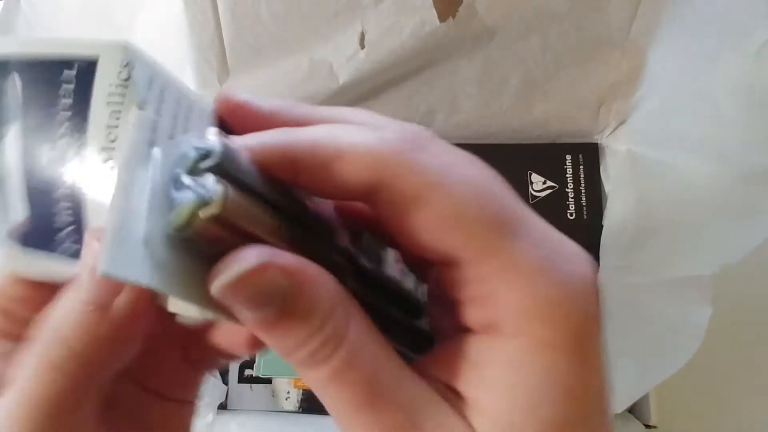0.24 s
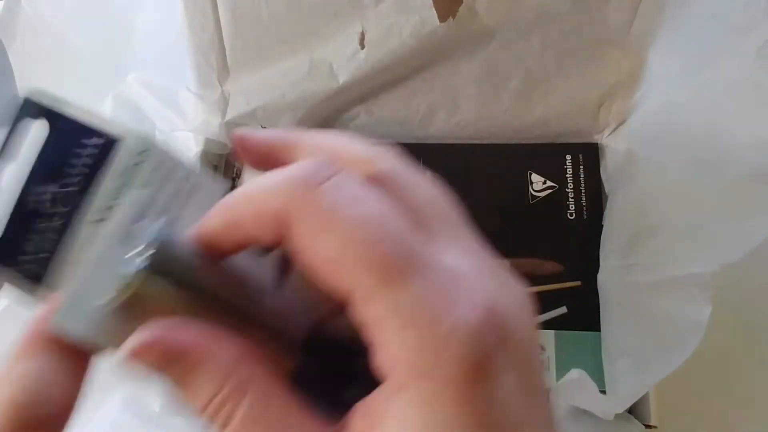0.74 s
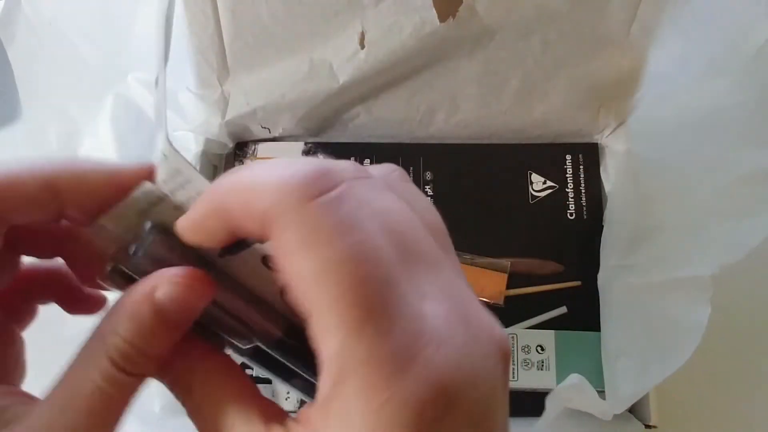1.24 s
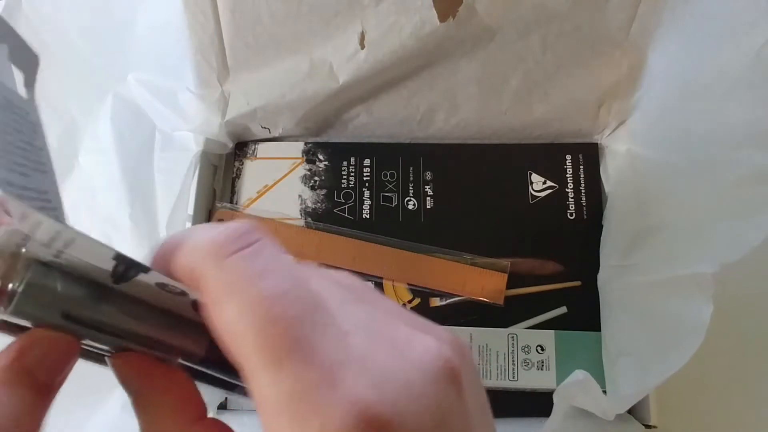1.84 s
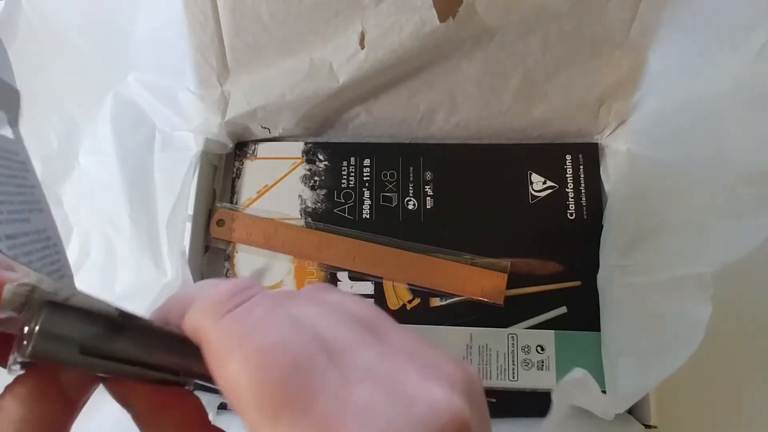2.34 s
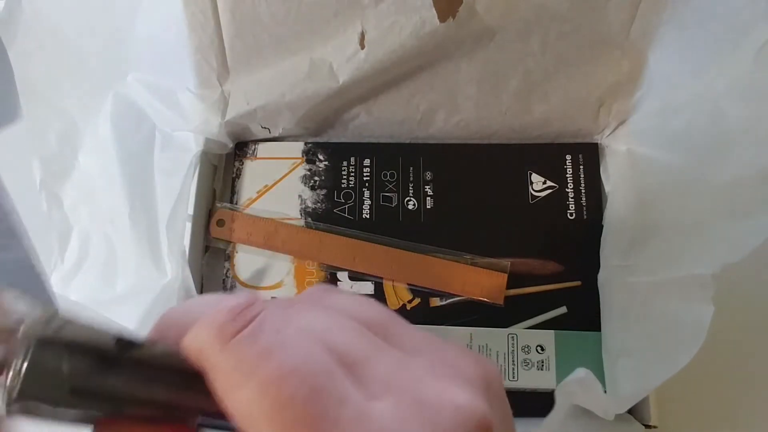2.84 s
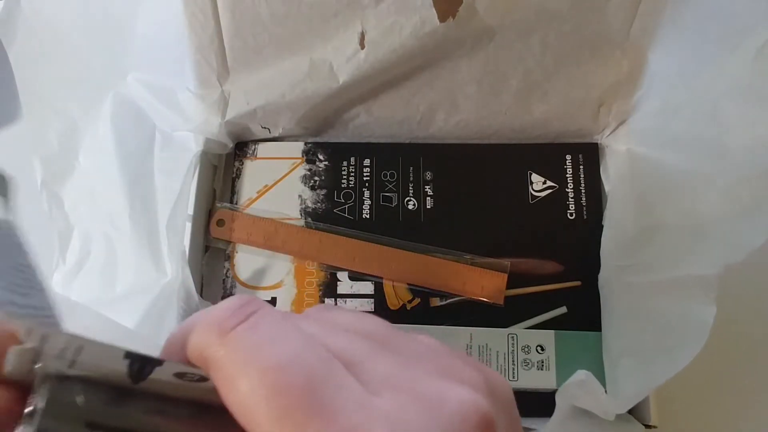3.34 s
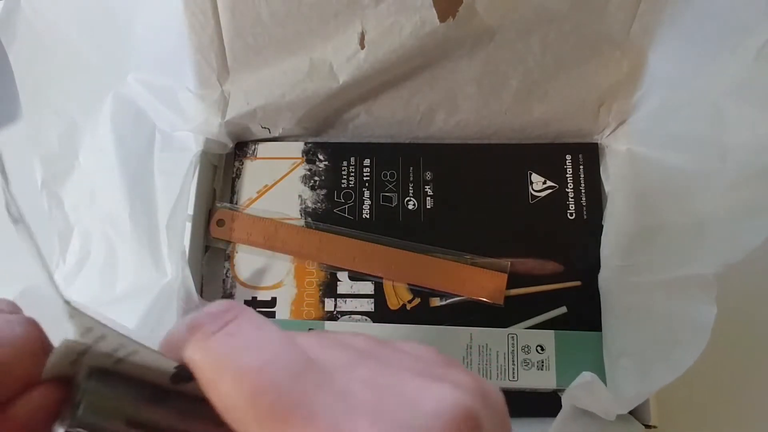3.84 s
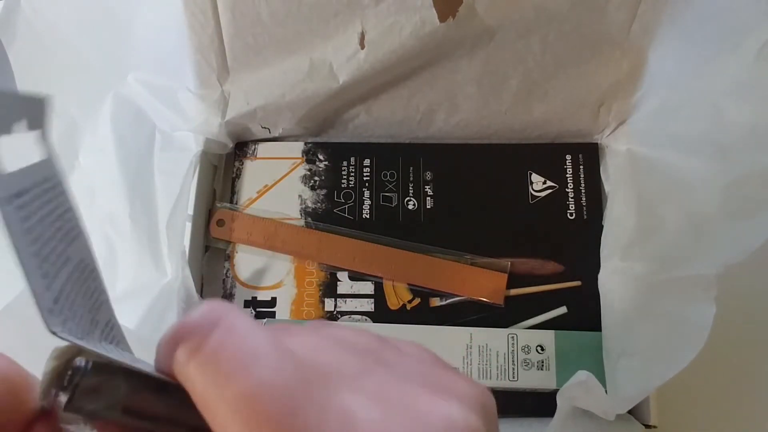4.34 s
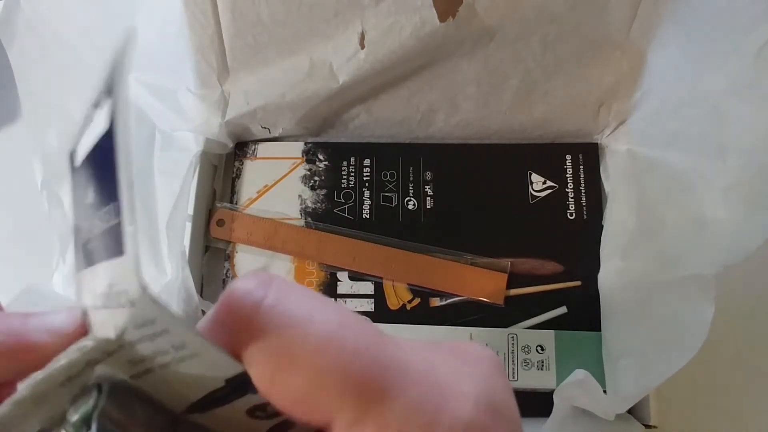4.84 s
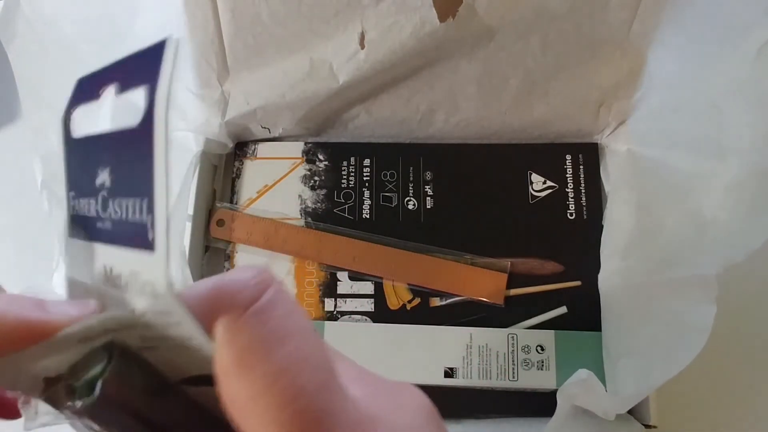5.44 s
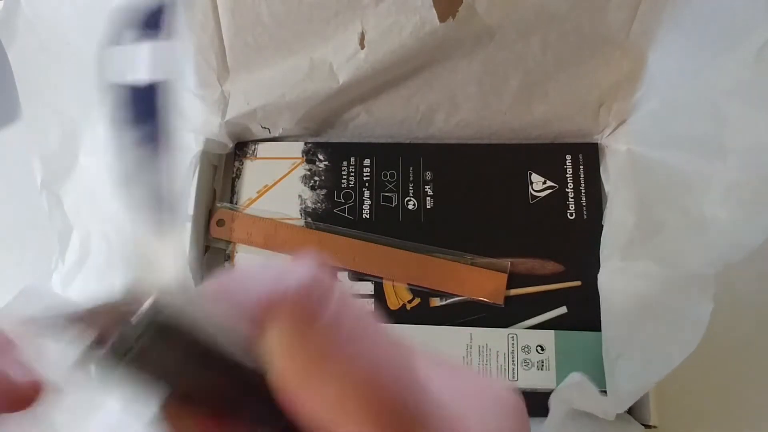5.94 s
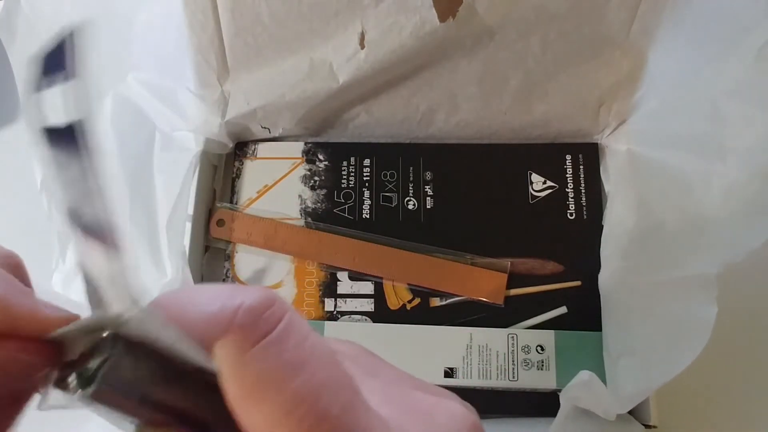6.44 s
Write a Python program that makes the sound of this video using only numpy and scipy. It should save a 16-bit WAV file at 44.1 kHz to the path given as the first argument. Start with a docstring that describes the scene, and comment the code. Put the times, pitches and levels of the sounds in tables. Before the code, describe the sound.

Stiff plastic blister packaging crackles and snaps in irregular sharp bursts as fingers bend it close up, in a quiet small room.

```python
"""A quiet room's coloured noise and a far hum, a wavering tone with its octave, lie underneath throughout.
From the very start rubs (showers of tiny cracks), card knocks and snaps (sharp coloured steps) mingle, as
fingers bend a stiff plastic blister pack; the room echoes them. Near 0.8 s the pack bumps the table, a
fading low tone. Snaps go on to the end, a very loud one early and many loud ones after 2 s.
The hands are left of a small stereo recorder, so the right is weaker; a limiter squeezes loud snaps."""
import sys
import numpy as np
from scipy import signal
from scipy.io import wavfile
from scipy.ndimage import uniform_filter1d, minimum_filter1d

SR = 44100
rng = np.random.default_rng(int(sys.argv[2]) if len(sys.argv) > 2 else 0)


def ratio_of_db(decibels):
    """Turn decibels (scalar or array-like) into linear amplitude factors; 0 dB maps to 1."""
    return 10 ** (np.asarray(decibels, float) / 20)


def output_pcm(signal):
    """Save a mono or channel-first signal as 16-bit PCM at the path in sys.argv[1].

    Samples are clipped to [-1, 1] before scaling.
    """
    pcm = np.clip(np.atleast_2d(signal).T, -1, 1) * 32767
    wavfile.write(sys.argv[1], SR, np.round(pcm).astype(np.int16))


N = 294493  # length [samples]
FAR_PORT_LAG_S = .0003  # the right port hears the hands this much later
THUMP_HZ = 400  # the card's dull thump lies mostly below this


def read(points, hz):
    """Looks up a table of (frequency, value), with frequency on a log scale."""
    f, value = np.transpose(points)
    return np.interp(np.log(hz + 1), np.log(f + 1), value)


def colour(x, points):
    """Gives a sound the listed spectrum, using a filter that only looks back in time."""
    hz = np.fft.fftfreq(4096, 1 / SR)
    log_gain = np.log(ratio_of_db(read(points, abs(hz))))
    # the Hilbert transform finds the phase that puts the energy as early as possible
    spectrum = np.exp(np.conj(signal.hilbert(log_gain)))
    taps = np.fft.ifft(spectrum).real[:2048]
    return signal.oaconvolve(np.atleast_2d(x), taps[None], axes=1)[:, :np.shape(x)[-1]]


def band(x, lo_hz, hi_hz):
    """Keeps one band of frequencies and scales it to rms 1."""
    sos = signal.butter(2, [lo_hz, min(hi_hz, .45 * SR)], "band", fs=SR, output="sos")
    y = signal.sosfilt(sos, x)
    return y / np.sqrt(np.mean(y ** 2) + 1e-20)


def add(mix, s, sound):
    """Mixes a sound in at time s, cutting what runs past the end."""
    part = mix[round(s * SR):][:len(sound)]
    part += sound[:len(part)]


# spectrum of the room tone, only its shape counts: (frequency [Hz], level [dB])
ROOM_TONE = [(24, -31), (40, 4), (536, -6), (957, -12), (1230, -11), (2970, -11), (6830, -22), (7750, -5.5),
             (10500, -31), (15300, -19), (16500, -58.5)]
# far hum, before the left/right balance:
# (time [s], frequency [Hz], level of the low tone [dB], level of its octave [dB])
FAR_HUM = [(0.0, 68.8, -68, -83.5), (1.53, 69.5, -71, -81), (3.12, 61.2, -73, -79.5),
           (5.64, 66.6, -67.5, -74), (5.84, 59.9, -71, -74), (6.01, 63.4, -68.5, -74),
           (6.68, 61.7, -81, -86.5)]


def background():
    """Room tone is noise partly shared by the ports; the hum is a wavering low tone and its octave."""
    noise = rng.standard_normal((3, N))
    tone = colour(noise[:2] + 0.14 * noise[2], ROOM_TONE)
    drift = band(rng.standard_normal(N), 2.1, 19)  # the tone breathes a little
    tone *= ratio_of_db(-65 + 0.89 * drift) / np.sqrt(np.mean(tone ** 2))
    s, *columns = np.transpose(FAR_HUM)
    hz, low_db, octave_db = (np.interp(np.arange(N) / SR, s, c) for c in columns)
    waver = 1 + 1.2 * uniform_filter1d(rng.standard_normal(N), 2000)
    phase = 2 * np.pi * np.cumsum(hz * waver) / SR
    hum = np.sqrt(2) * (ratio_of_db(low_db) * np.sin(phase) + ratio_of_db(octave_db) * np.sin(2 * phase))
    return (tone + hum) * ratio_of_db(np.array([[2.5], [-2.5]]))  # left a little louder


# how the plastic sheet colours cracks and snaps: (frequency [Hz], level [dB])
PLASTIC_SHEET = [(120, -68.5), (500, -11.5), (1200, -4), (2500, 2.5), (4000, 5.5), (6500, 6), (12000, 6)]
# facets of the blister that take turns to sound: (frequency [Hz])
FACET_TONES = [1100, 1500, 2000, 2700, 3600, 4700, 6000]
# fingers rubbing: (time of full pressure [s], hold [s], crackle level before the microphone [dB],
# card level against the film [dB], treble edge level against the film [dB])
FINGER_RUBS = [(0.021, 0.083, -37.5, -13.5, 3.5), (0.245, 0.099, -45.5, -16, -6.5),
               (0.374, 0.017, -37.5, -45, 9.5), (0.592, 0.016, -35, -30, 2), (0.608, 0.015, -26, -21, -3.5),
               (0.665, 0.088, -37.5, -5, -2), (0.774, 0.0041, -28.5, 4, -11),
               (0.788, 0.013, -55.5, -2, 0.5), (0.863, 0.033, -47.5, -8, 5.5),
               (1.066, 0.074, -59.5, -24, 10), (1.187, 0.018, -34, -3.5, 1.5), (1.261, 0.052, -45.5, 0, -3),
               (1.341, 0.054, -42, -0.5, 1), (1.425, 0.033, -40, -5, -1.5), (1.716, 0.011, -52.5, -0.5, 4),
               (1.863, 0.044, -43.5, -11, 0), (2.637, 0.023, -62, 3, 4), (2.754, 0.007, -65, -6, -15),
               (2.994, 0.026, -40, -11.5, 3.5), (3.312, 0.054, -49, -19, -17), (4.03, .03, -6.5, -22.5, -2),
               (4.381, 0.015, -35.5, -37, 7), (4.7, 0.033, -53.5, 1, -17), (4.841, 0.015, -48.5, -14, -8),
               (5.054, .05, -21, -25, -2), (5.408, 0.025, -42.5, -5, 6.5), (5.552, 0.091, -56, -13, 5.5),
               (5.741, 0.0043, -55, 2, -15), (5.869, 0.055, -22.5, -8.5, 13.5),
               (6.153, 0.0065, -54.5, -41, 4), (6.232, 0.016, -61, -24, -3),
               (6.36, 0.0077, -52.5, -10.5, -19), (6.477, 0.017, -59.5, -1.5, -10.5)]


def rubs():
    """Moving fingers set off dense tiny cracks of uneven size, in clumps, on plastic and card."""
    cracks_per_s, spread_db, clump_db = 3600, 2.4, 1.5
    facet_db = 2.5  # how strongly each facet comes and goes
    card_hz, card_ring_db = 950, -6  # the card rings a little under the fingers
    press_s, still_db = 0.032, -74.5  # a rub swells from this level over this time
    tire_db_per_s, lift_db_per_s = 89, 1109.5  # sag from full pressure on; extra fall once the finger lifts

    clumps = band(rng.standard_normal(N), 30, 170)
    size = ratio_of_db(spread_db * np.minimum(rng.exponential(1, N), 5) + clump_db * clumps)
    cracks = size * (rng.random(N) < cracks_per_s / SR) * rng.choice([-1., 1.], N)
    facets = np.zeros(N)
    for hz in FACET_TONES:
        turns = facet_db * band(rng.standard_normal(N), 8, 40)
        share = ratio_of_db(read(PLASTIC_SHEET, hz) + turns) * np.sqrt(hz)
        facets += share * band(cracks, hz / 1.2, hz * 1.2)
    film = band(facets, 1400, 5200)
    edge = band(cracks * rng.choice([-1., 1.], N), 6200, 24000)
    card_ring = band(cracks, card_hz / 1.1, card_hz * 0.98)
    card = band(cracks, 78, 1200) + ratio_of_db(card_ring_db) * card_ring

    out = np.zeros(N)
    t = np.arange(N) / SR
    for s, hold, level_db, card_db, edge_db in FINGER_RUBS:
        now = slice(max(round((s - .1) * SR), 0), round((s + hold + .1) * SR))
        since = t[now] - s
        swell_db = (still_db - level_db) * since / press_s
        loss_db = np.where(since < 0, swell_db, tire_db_per_s * since)
        loss_db = loss_db + lift_db_per_s * np.maximum(since - hold, 0)
        crackle = film[now] + ratio_of_db(card_db) * card[now] + ratio_of_db(edge_db) * edge[now]
        out[now] += ratio_of_db(level_db - loss_db) * crackle
    return out


# how long the room takes to die away by 60 dB: (frequency [Hz], time [s])
ROOM_DECAY = [(200, 0.13), (530, 0.2), (1390, 0.21), (3680, 0.22), (9700, 0.17)]
# strength of the room's answer, left then right: (level [dB])
ROOM_LEVEL = [-7.5, -11]


def room(x):
    """Walls return sparse echoes of random sign for each row and port; each band dies at its own speed."""
    rise_s = 0.0087  # the room builds up after the sound
    wall_s, wall_width_s, wall_db = 0.0095, 0.0023, -0.5  # first strong reflection
    length = SR // 2
    taps = np.zeros((len(x), 2, length))
    delay = np.arange(length) / SR
    slots = np.arange(160, length - 12, 12)
    at = slots + rng.integers(0, 12, (len(x), 2, len(slots)))  # one echo somewhere in each slot
    np.put_along_axis(taps, at, rng.choice([-1., 1.], at.shape), 2)
    build_up = 1 - np.exp(-(delay / rise_s) ** 2)
    wall = ratio_of_db(wall_db) * np.exp(-((delay - wall_s) / wall_width_s) ** 2)
    taps *= build_up + wall
    hz, t, z = signal.stft(taps, SR, nperseg=128)
    decay = ratio_of_db(-60 * t / read(ROOM_DECAY, hz)[:, None])
    tail = signal.istft(z * decay, SR, nperseg=128)[1]
    tail *= ratio_of_db(np.array(ROOM_LEVEL))[:, None] / np.linalg.norm(tail, axis=2, keepdims=True)
    return signal.oaconvolve(x[:, None], tail, axes=2)[..., :N].sum(0)


def thump(hz):
    """Power spectrum of the card's dull low motion: weak above THUMP_HZ and below 70 Hz."""
    return 1 / (1 + (hz / THUMP_HZ) ** 4) / (1 + (70 / hz) ** 4)


def struck(peak_db, hz, power):
    """A sudden jolt: one sharp click with the given power spectrum and peak."""
    click = np.zeros(1500)
    click[0] = 1
    sound = colour(click, np.transpose([hz, 10 * np.log10(power)]))[0]
    return ratio_of_db(peak_db) * sound / abs(sound).max()


# the backing card jerks: (time [s], peak level before mixing [dB])
CARD_KNOCKS = [(0.0288, -26.5), (0.6891, -30), (0.7384, -27), (0.777, -15), (0.8942, -42), (1.1936, -37),
               (1.3586, -49), (1.4391, -32), (1.9388, -49), (2.1873, -27.5), (2.2964, -28.5), (2.5092, -21),
               (2.8578, -26), (3.1298, -26.5), (3.3656, -24), (3.5157, -25.5), (3.5842, -22), (3.727, -45),
               (4.032, -23), (4.698, -38), (5.0552, -15), (5.2076, -38), (5.2853, -23.5), (5.301, -18.5),
               (5.4127, -45), (5.8719, -32.5), (5.8935, -33), (6.613, -38)]


def knocks():
    """The card jerks with a dull knock; lists (time, sound, share heard directly)."""
    hz = np.geomspace(30, 20000, num=60)
    return [(s, struck(peak_db, hz, thump(hz)), .5) for s, peak_db in CARD_KNOCKS]


def snap(peak_db, panel_hz, ring_db, edge_db):
    """A crease gives way: the colour of the sheet, a briefly ringing panel and the thump of the card."""
    tilt_hz, ring_octaves = 4200, .23  # brightness acts above the first; width of a panel's ring
    thump_db = -28  # every snap also shakes the card a little
    hz = np.geomspace(30, 20000, num=120)
    sheet = ratio_of_db(read(PLASTIC_SHEET, hz) + edge_db / (1 + (tilt_hz / hz) ** 4)) ** 2
    ring = ratio_of_db(ring_db) ** 2 * np.exp(-(np.log2(hz / panel_hz) / ring_octaves) ** 2)
    card = ratio_of_db(thump_db) ** 2 * thump(hz)
    # powers as shares of the whole band, so that narrow parts stand higher per Hz
    power = sheet + ring * tilt_hz / (ring_octaves * panel_hz) + card * tilt_hz / THUMP_HZ
    return struck(peak_db, hz, power)


# creases snapping: (time [s], peak level before mixing [dB], ringing panel frequency [Hz],
# ring level [dB], brightness [dB])
CREASE_SNAPS = [(0.0293, -8.5, 3000, -14, -5.5), (0.1694, 19.5, 4200, -9.5, -11),
                (0.292, -7.5, 1160, -7.5, -3), (0.37, -10, 3500, 14, 12), (0.384, -22, 3190, 21.5, -1),
                (0.4708, -19.5, 5230, -5, -5), (0.6917, -13, 540, -5, -16.5), (0.6976, -14.5, 656, 6, -9.5),
                (0.7391, -7.5, 675, -8, -10.5), (0.7672, 1.5, 5500, 15, 10), (0.7765, 1.5, 720, -2, -13.5),
                (0.8914, -15.5, 770, -8.5, -13.5), (0.975, -33, 1900, 3, -1),
                (1.193, -0.5, 1790, -0.5, -13), (1.2674, -14.5, 904, -8, -21.5), (1.3183, -16, 1020, 9, -8),
                (1.3611, -18, 930, 1.5, -19), (1.4393, -5, 4930, 5.5, -7.5), (1.5313, -5, 960, -9, -17.5),
                (1.603, -2, 1620, -15, -20.5), (1.7251, -17.5, 3160, -4, -9.5),
                (1.8638, -12, 1220, -5.5, -19.5), (1.9382, -19.5, 970, -5.5, 2.5),
                (1.983, -5.5, 1810, -15, -32.5), (2.1303, -0.5, 4480, 1.5, 0.5), (2.1809, 5, 2160, -6, -13),
                (2.1876, -1.5, 5330, -17.5, -15), (2.1998, 4, 2200, -6, -22), (2.2964, 8, 4450, 6.5, 1.5),
                (2.3201, 10.5, 6000, 10.5, 7), (2.4145, 12.5, 5100, 12, 7.5),
                (2.461, -3, 2135, -11.5, -23.5), (2.5104, 14, 931, -1.5, -5.5), (2.6447, -29, 980, -6, -11),
                (2.7395, -25.5, 940, -10, -15), (2.8201, -4, 5800, -13, 1.5), (2.8569, 11, 5360, 7.5, 3.5),
                (2.9806, -16, 6160, 3, 4), (2.99, -12, 5930, -2, 4), (3.1295, 15.5, 4810, -8.5, 2.5),
                (3.1533, 11, 5220, 2.5, 11), (3.3668, 12, 2920, 11.5, 7.5), (3.45, -2, 2840, 0, -19.5),
                (3.5166, 9.5, 5040, 6.5, -7), (3.5721, 1.5, 5500, 2.5, -4.5),
                (3.5843, 13.5, 2030, -6.5, -14.5), (3.6084, 4, 1810, -9, 3.5), (3.6171, -3, 2180, 0.5, -7),
                (3.785, -31.5, 2000, -4.5, -10), (3.815, -26, 3470, 0, -8), (3.8384, 1, 1930, -7.5, -13.5),
                (4.0145, 18.5, 3300, -9, -7.5), (4.031, 8.5, 1940, -11.5, -4.5), (4.0551, 4, 3100, -9, -11),
                (4.1633, 11.5, 5500, -3.5, -12), (4.2834, 1, 1930, -4.5, -13.5),
                (4.3938, -11.5, 1605, -5, -13), (4.4922, -17, 3920, 2, -14.5),
                (4.5044, -15.5, 1120, -16.5, -17.5), (4.5432, -7.5, 2540, -10, -15),
                (4.5505, 23, 1619, -15, -10.5), (4.6974, -15, 730, -4.5, -17),
                (4.827, -25.5, 1330, -3, -24.5), (4.9046, 19, 1688, -8.5, -6),
                (5.0517, -9.5, 3270, -4, -23), (5.0544, 14, 3200, 1, -9), (5.0878, 15.5, 5600, 4, 2),
                (5.1657, -5, 5230, 0.5, -10.5), (5.2075, -26, 620, 6.5, -12.5),
                (5.2644, -14.5, 1070, -8, -14.5), (5.2848, 10.5, 4440, 1.5, -6.5),
                (5.3004, 11.5, 1330, -7, -6), (5.4142, -9.5, 1830, -5.5, -16),
                (5.5604, -26, 5260, 3, -11.5), (5.6647, -31.5, 970, -1, -10), (5.7478, -7, 5950, 1, -11),
                (5.7582, -8.5, 4800, 2.5, -10), (5.8342, -16.5, 5100, 9.5, 7.5),
                (5.857, 10, 4770, 11, -3.5), (5.8724, 9, 1400, -5, -13), (5.8938, -4, 1680, 3.5, -7),
                (5.9145, 16, 5700, -15.5, -5.5), (6.0168, 7, 2740, -5, -17), (6.027, 1, 2500, -8.5, -10),
                (6.3537, -18, 5960, -2.5, -5.5), (6.4719, -30.5, 950, -3, -13),
                (6.5451, 2.5, 5740, -1, -4.5), (6.614, 11.5, 6500, -1.5, -5)]


def snaps():
    """Creases snap through, weaker ones less abruptly; lists (time, sound, share heard directly)."""
    crisp_db = -4  # a snap with this peak is half direct
    return [(s, snap(*how), 1 / (1 + ratio_of_db(crisp_db - how[0]))) for s, *how in CREASE_SNAPS]


# strength of the scattered sound, left then right: (level [dB])
SCATTER_LEVEL = [1.5, -6]


def spread(events):
    """Hands, pack and box scatter each jolt; rows dealt in turn meet different room reflections."""
    fade_s = 0.0022
    lead_in_s, lead_in_db = .0015, -15.5  # a faint noise swells just before each jolt
    rows, direct, scatter = np.zeros((3, N)), np.zeros(N), np.zeros((2, N))
    t = np.arange(-200, 700) / SR - np.array([[0], [FAR_PORT_LAG_S]])
    lead_in = ratio_of_db(lead_in_db) * np.exp(-abs(t) / lead_in_s)
    shape = np.where(t > 0, np.exp(-abs(t) / fade_s), lead_in)
    for k, (s, sound, abrupt) in enumerate(events):
        add(rows[k % 3], s, sound)
        add(direct, s, sound * abrupt)
        paths = rng.standard_normal(t.shape) * shape
        for port in range(2):
            gain = ratio_of_db(SCATTER_LEVEL[port]) / np.linalg.norm(paths[port])
            add(scatter[port], s + t[0, 0], gain * signal.fftconvolve(sound, paths[port]))
    return rows, direct, scatter


def ports(x):
    """Direct sound reaches the right port later and shadowed."""
    lag = round(FAR_PORT_LAG_S * SR)
    return np.array([x, ratio_of_db(-12.5) * np.pad(x, (lag, 0))[:N]])


def bump():
    """The pack once bumps the table under the recorder: a low thud that swells fast and dies away."""
    start_s, level_db, hz, t60_s, rise_s = .778, -19, 78, 0.092, 0.0043
    t, out = np.arange(SR // 4) / SR, np.zeros(N)
    envelope = ratio_of_db(level_db - 60 * t / t60_s) * (1 - np.exp(-t / rise_s))
    add(out, start_s, envelope * np.sin(2 * np.pi * hz * t))
    return out


# how the microphones colour the pack and its echoes: (frequency [Hz], gain [dB])
MIC_COLOUR = [(40, 6.5), (100, 2.5), (6500, 4), (7200, 2.5), (7850, 12.5), (8500, 5), (10500, -13.5),
              (15300, -6.5), (16500, -39.5)]


def microphones(left, right):
    """So close, bass falls off further on the way to the right; both ports then share one colour."""
    bass_hz, bass_far_db = 288, -7.5
    right = colour(right, [(bass_hz / 2, bass_far_db), (bass_hz * 2, 0)])[0]
    return colour(np.array([left, right]), MIC_COLOUR)


def scene():
    """Pack, room and background at the two ports."""
    creases, direct, scatter = spread(snaps() + knocks())
    fingers = rubs()
    turn = 14. * np.arange(N) / SR  # moving hands keep changing what the rubs reflect from
    echoes = room(np.vstack([creases, fingers * np.cos(turn), fingers * np.sin(turn)]))
    left, right = ports(direct + fingers + bump()) + scatter + echoes
    return microphones(left, right) + background()


def band_limit(x):
    """A steep low-pass at the top of the band."""
    return signal.sosfilt(signal.butter(12, 17000, fs=SR, output="sos"), x)


def record(dry):
    """Each channel has a limiter that turns down just ahead of a peak, then lets go at a steady rate."""
    over_db = np.maximum(20 * np.log10(abs(dry) + 1e-9), 0)
    fall_db = np.arange(N) * 586.0 / SR  # release [dB/s]
    cut_db = np.maximum.accumulate(over_db + fall_db, axis=1) - fall_db
    ahead_db = -minimum_filter1d(-cut_db, size=25, axis=1)  # largest cut nearby
    limited = dry / ratio_of_db(uniform_filter1d(ahead_db, size=21, axis=1))
    return band_limit(np.clip(limited, -1, 1))


dry = scene()
out = record(dry)
output_pcm(out)
```